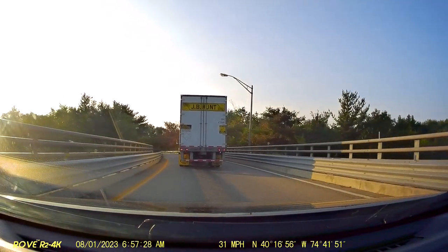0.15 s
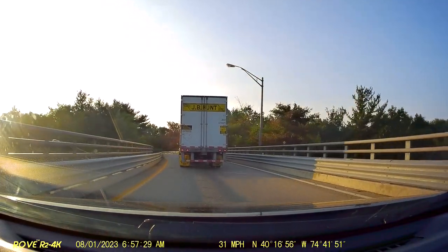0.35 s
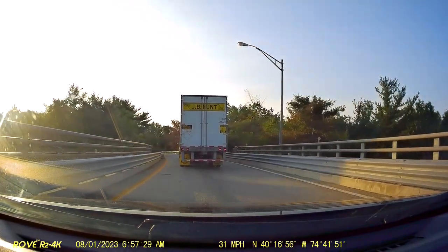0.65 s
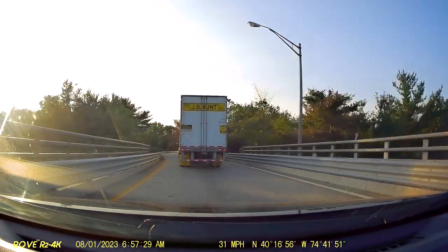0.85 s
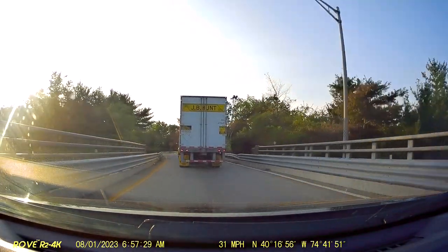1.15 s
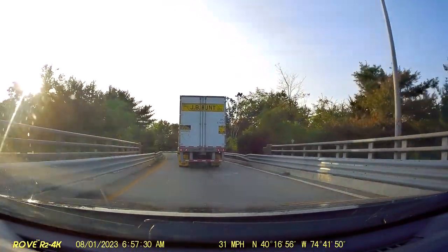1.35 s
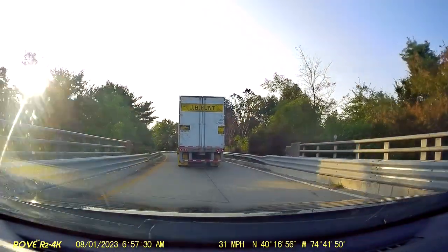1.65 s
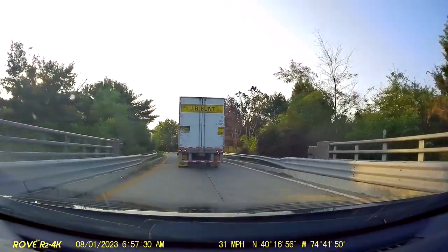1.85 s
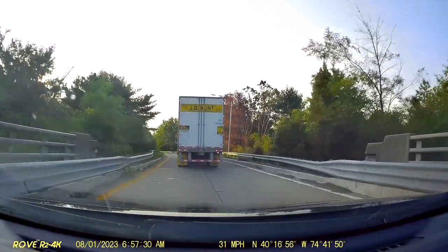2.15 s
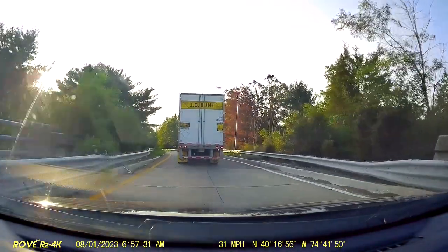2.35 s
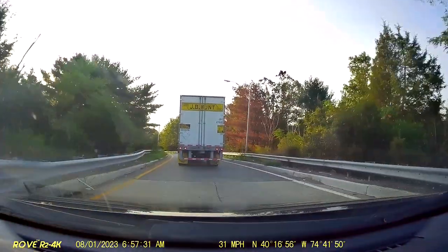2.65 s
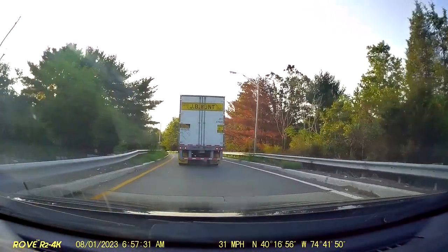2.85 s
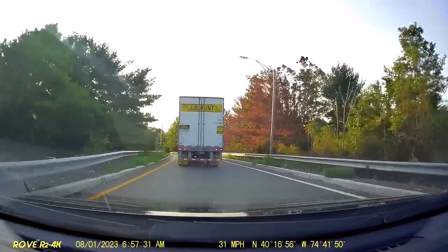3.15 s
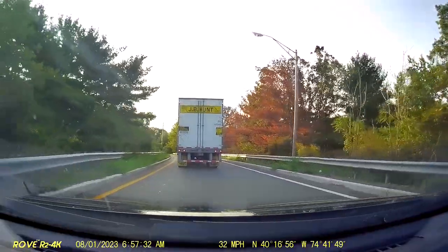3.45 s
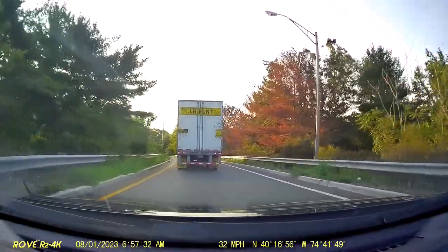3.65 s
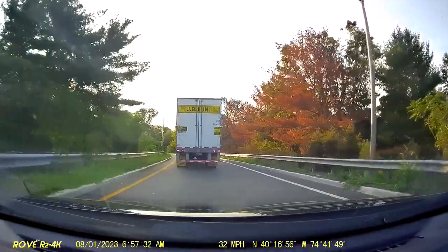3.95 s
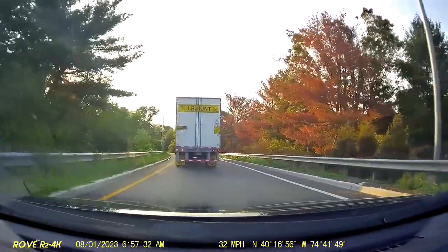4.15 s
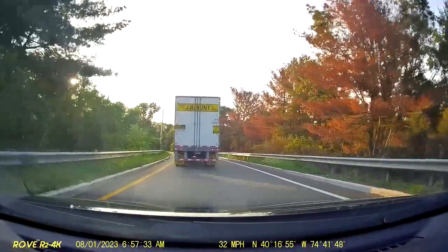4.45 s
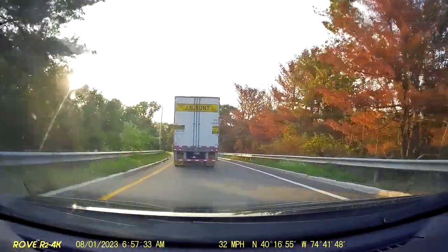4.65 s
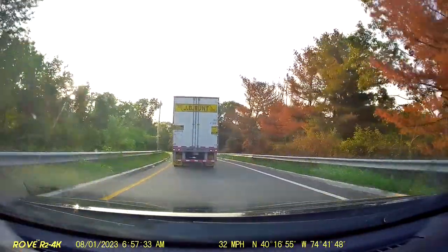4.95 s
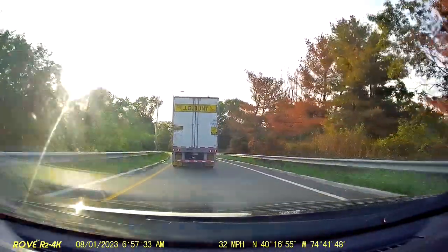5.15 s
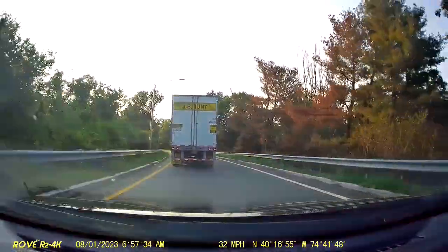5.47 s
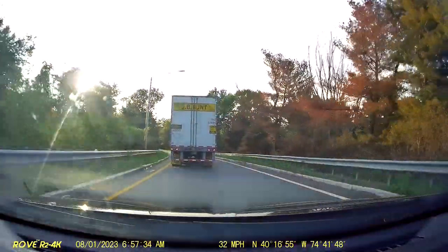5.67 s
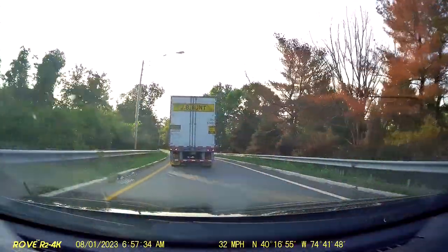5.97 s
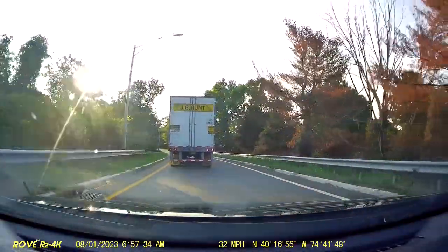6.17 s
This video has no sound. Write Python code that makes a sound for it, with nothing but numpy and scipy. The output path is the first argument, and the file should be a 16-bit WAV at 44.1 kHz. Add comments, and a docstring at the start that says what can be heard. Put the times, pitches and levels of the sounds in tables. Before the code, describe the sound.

A car's low rumble, engine drone and tyre noise heard from the cabin, with a run of dull thumps, then easing on smooth asphalt.

```python
"""A deep road rumble, a roar of tyres and a low engine drone, heard inside a car at the windscreen.
The car cruises at about 50 km/h over a concrete bridge, then on to smoother, quieter asphalt.
The rough road shakes the body and rings the air in the tyres; the tread roars through the glass
and rushing air hisses. Twice a low boom swells, as of tyres over road ripples. Road joints thump
the wheels and stir the plastic trim. Later, on the asphalt, two thin whines come and go."""
import sys
import numpy as np
from scipy import signal
from scipy.fft import rfft, irfft
from scipy.io import wavfile
from scipy.ndimage import uniform_filter1d

SR = 44100
rng = np.random.default_rng(int(sys.argv[2]) if len(sys.argv) > 2 else 0)


def to_wav(s):
    """Save 16-bit WAV."""
    ch = np.atleast_2d(s).T  # columns
    pcm = np.round(np.clip(ch, -1, 1) * 32767)  # PCM
    wavfile.write(sys.argv[1], SR, pcm.astype(np.int16))


N = 278271
TIME = np.arange(N) / SR
FREQS = np.maximum(np.arange(N // 2 + 1) * SR / N, 1)

# How strong each pitch is inside the car. Columns: pitch_hz, level_db
SHAKE_TONE = [(12, -25), (22, -19), (33, 0), (41, -4.5), (52, -7), (63, 5), (73, -10), (86, -2), (112, -6),
              (150, -15), (260, -77)]  # the shaking body
DRUM_TONE = [(70, -24), (130, -2), (152, 2), (178, 3.5), (245, -5), (310, 0), (348, 0.5), (390, -9.5),
             (480, -9.5), (800, -24.5)]  # coarse road drumming through the wheels
TREAD_TONE = [(250, -6.5), (450, 0), (620, 0), (740, -4.5), (900, -3.5), (1020, -4.5), (1160, -5.5),
              (1320, -7.5), (1640, -12), (1850, -20.5), (2800, -26), (3900, -33)]  # the roaring tread
WIND_TONE = [(800, -5), (1900, 6.5), (3000, 7.5), (3900, 0), (4700, 1), (5600, -2), (7000, -2.5),
             (10000, -5.5), (13000, -7), (15500, -11)]  # air rushing round the windscreen
# Worn stretches of road. Columns: middle_s, reach_s, extra_shake_db, extra_drum_db
WORN_PATCHES = [(.35, 0.23, -2.5, 2.5), (1.55, 0.44, 3.5, 3), (2.2, 0.11, 2, 1), (3.0, 0.15, 1, 3.5),
                (4.87, 0.097, 3.5, 3)]
# Pitches at which the panels and cabin ring. Columns: pitch_hz, width_hz, concrete_db, asphalt_db
PANEL_RINGS = [(670.7, 28, 7, 3.5), (838, 53, 7, 4.5), (928, 34, 7, 5), (1079.6, 59, 8.5, 8.5),
               (1115, 25, -4, -9), (1312, 78, 6, 5), (2696, 51, 7, 8)]
# Low, throbbing booms, as of tyres over road ripples. Columns: start_s, length_s, fade_s, level_db
LOW_BOOMS = [(0.032, 0.56, 0.27, -36), (4.916, 0.42, 0.09, -41.5)]
# Wheels hitting joints and patches, rear about 0.2 s after front. Columns: start_s, level_db, contact_s
WHEEL_HITS = [(1.282, -25.5, 0.0037), (1.307, -21, 0.016), (1.455, -20.5, 0.014), (1.525, -17, 0.0074),
              (2.076, -23, 0.005), (2.268, -21.5, 0.0054), (2.859, -16, 0.0056), (3.052, -19.5, 0.0034),
              (3.079, -16.7, 0.006), (3.266, -14, .0105), (3.477, -16, .015), (4.753, -33, .005),
              (4.944, -33, 0.011), (6.03, -35, 0.0048)]
# Low notes of the body and cabin after a hit. Columns: pitch_hz, rise_s, fade_60_db_s, level_db
BODY_NOTES = [(40.7, 0.04, 0.5, 2.5), (66.8, 0.0052, .24, 2.5), (83.8, 0.026, 0.15, 6),
              (98.5, 0.0065, 0.091, 9.5), (136, 0.0046, 0.092, 9), (222.2, 0.011, 0.66, 2)]
# Loose trim knocking, rubbing and ticking. Columns: start_s, level_db, length_s, pitch_hz, width_hz
TRIM_RATTLES = [(2.014, -37, 0.048, 510, 220), (2.16, -61, 0.23, 3200, 2300),
                (2.855, -38.5, 0.02, 950, 1200), (2.857, -54, 0.028, 2450, 2300),
                (3.326, -58, .026, 2800, 3400), (3.486, -58, 0.077, 3030, 2830),
                (3.494, -54, 0.011, 4900, 2500), (3.503, -57.5, 0.016, 5270, 3300),
                (3.515, -57.5, 0.0031, 8000, 5500), (4.768, -60, 0.005, 7000, 8000)]
# Brief thin tones. Columns: start_s, end_s, start_hz, end_hz, level_db
THIN_WHINES = [(3.606, 4.13, 1249, 1236, -56), (4.85, 5.64, 1724, 1733, -63)]

ASPHALT_S, CHANGE_S = 3.56, 0.23  # when the concrete ends, and how long the change takes
FIRING_HZ, SAG_HZ_PER_S = 43.04, 0.42  # the engine's firing rate starts here and sinks
ENGINE_DB, EASE_DB_PER_S = -39.5, 1.26  # so does its level
BOOM_RISE_S, CREST_S, CREST_DB = 0.031, 0.0013, 9  # a crest is the sharp peak in each cycle of a boom
THUMP_DB, JUDDER_DB, SLAP_DB = -6.5, -16, -30  # added to each wheel hit's level


def gain(db):
    """Turn decibels into a number to multiply by."""
    return 10 ** (np.asarray(db) / 20)


def unit(x):
    """Scale a signal to an average strength (rms) of 1."""
    return x / np.sqrt(np.mean(x ** 2))


def tone_curve(points):
    """Join (pitch_hz, level_db) points into gains, falling 24 dB an octave past the last."""
    hz, db = np.transpose(points)
    return gain(np.interp(np.log(FREQS), np.log(hz), db)) * np.minimum(hz[-1] / FREQS, 1) ** 4


def peak(hz, width_hz):
    """Gains of something that rings at one pitch; raising them to a power narrows the peak."""
    return 1 / np.sqrt(1 + ((FREQS ** 2 - hz ** 2) / (FREQS * width_hz)) ** 2)


def noise(gains):
    """Noise of strength 1, shaped by a gain for each pitch."""
    return unit(irfft(rfft(rng.standard_normal(N)) * gains, N))


def wander(rate_hz):
    """A smooth random wobble of strength 1."""
    return noise(np.exp(-(FREQS / rate_hz) ** 2))


def steady(x, span_s):
    """Even out a noise's slow swells and keep its quick flutter."""
    return x / np.sqrt(uniform_filter1d(x ** 2, int(span_s * SR)) + 1e-9)


def burst(start_s, length_s):
    """A level that jumps up to 1 and dies away."""
    age = np.clip((TIME - start_s) / length_s * 4, 0, 40)
    return age * np.exp(1 - age)


def on_asphalt(lead_s):
    """Goes from 0 on concrete to 1 on asphalt; lead_s makes the change come early."""
    return np.clip((TIME + lead_s - ASPHALT_S) / CHANGE_S + 0.5, 0, 1)


def road_db(concrete_db, step_db, db_per_s, lead_s=0):
    """A level that holds on concrete, steps down on asphalt and sinks as the road gets smoother."""
    return concrete_db + step_db * on_asphalt(lead_s) + db_per_s * np.maximum(TIME - ASPHALT_S, 0)


def road_wear():
    """Extra decibels of shake and of drumming, coming and going over each worn patch."""
    return sum(np.outer((shake_db, drum_db), np.exp(-((TIME - middle_s) / reach_s) ** 2))
               for middle_s, reach_s, shake_db, drum_db in WORN_PATCHES)


def body_shake(wear_db):
    """The uneven road shakes the car's body into a deep rumble."""
    level_db = road_db(concrete_db=-34.5, step_db=-5, db_per_s=-1.3) + wear_db
    return steady(noise(tone_curve(SHAKE_TONE)), span_s=0.15) * gain(level_db)


def road_drumming(wear_db):
    """The coarse surface drums up through the wheels."""
    level_db = road_db(concrete_db=-37.5, step_db=-6, db_per_s=-0.84, lead_s=0.12) + wear_db
    return steady(noise(tone_curve(DRUM_TONE)), span_s=0.12) * gain(level_db)


def tyre_ring(wear_db):
    """The air inside the tyres rings at one pitch, mostly on rough concrete."""
    level_db = road_db(concrete_db=-43.5, step_db=-8, db_per_s=-1.5) + 1.6 * wear_db
    return steady(noise(peak(hz=219.6, width_hz=10.1) ** 2), span_s=0.13) * gain(level_db)


def tread_roar():
    """Tread blocks patter on the road; glass and panels shape the roar, which flutters with the road."""
    lead_s = 0.2  # softens first, as soon as the front tyres reach asphalt
    roar = noise(tone_curve(TREAD_TONE))
    lift_db = sum(np.outer((concrete_db, asphalt_db), peak(hz, width_hz) ** 2)
                  for hz, width_hz, concrete_db, asphalt_db in PANEL_RINGS)
    concrete, asphalt = (unit(x) for x in irfft(rfft(roar) * gain(lift_db), N))
    share = on_asphalt(lead_s)
    level_db = road_db(concrete_db=-41, step_db=-2.5, db_per_s=-0.43, lead_s=lead_s)
    flutter_db = 0.57 * wander(rate_hz=21) + 0.15 * wander(rate_hz=6.3)
    return (concrete * (1 - share) + asphalt * share) * gain(level_db + flutter_db)


def wind_hiss():
    """Air rushing round the windscreen makes a smooth, steady hiss."""
    return gain(-62) * noise(tone_curve(WIND_TONE))


def drone_and_booms():
    """A low engine drone eases off, and twice a rippled road booms at the same pitch."""
    boom = 0
    for start_s, length_s, fade_s, db in LOW_BOOMS:
        rise = (TIME - start_s) / BOOM_RISE_S
        fall = (start_s + length_s - TIME) / fade_s
        boom += gain(db) * np.clip(np.minimum(rise, fall), 0, 1)
    hz = FIRING_HZ - SAG_HZ_PER_S * TIME
    phase = 2 * np.pi * np.cumsum(hz * (1 + 0.00986 * wander(rate_hz=3.9))) / SR
    hum = unit(np.sin(phase) + gain(-9.5) * np.sin(2 * phase) + gain(-7.5) * np.sin(3 * phase))
    hum *= gain(ENGINE_DB - EASE_DB_PER_S * TIME) + boom
    crests = np.exp((np.sin(phase) - 1) / (2 * np.pi * hz * CREST_S) ** 2)
    throb = gain(CREST_DB) * boom * (crests - crests.mean())
    return (hum + throb) * gain(0.54 * wander(rate_hz=6.4))


def body_ring():
    """The car's answer to one hit: the cabin knocks at once and the heavy body swings up later."""
    age = TIME[:SR // 2]
    ring = 0
    for hz, rise_s, fade_s, db in BODY_NOTES:
        swell = np.sin(np.pi / 2 * np.minimum(age / rise_s, 1)) ** 2
        fade = gain(db - 60 * np.maximum(age - rise_s, 0) / fade_s)
        ring += swell * fade * np.sin(2 * np.pi * hz * age)
    return ring


def joint_thumps():
    """A joint pushes a wheel: the body thumps, the broken edge judders and the tread slaps."""
    push, judder, slap = np.zeros((3, N))
    for start_s, db, contact_s in WHEEL_HITS:
        pulse = np.sin(np.pi * np.clip((TIME - start_s) / contact_s, 0, 1))
        push += gain(db) * pulse / pulse.sum()
        judder += gain(db + JUDDER_DB) * burst(start_s, length_s=0.08)
        slap += gain(db + SLAP_DB) * burst(start_s, length_s=0.025)
    thumps = gain(THUMP_DB) * signal.fftconvolve(push, body_ring())[:N]
    judder *= steady(noise(peak(hz=159, width_hz=148) ** 2), span_s=0.11)
    slap *= noise(peak(hz=540, width_hz=560) ** 2)
    return thumps + judder + slap


def trim_rattle():
    """Plastic trim knocks and rubs in short, grainy bursts as the body twists."""
    grain = gain(2 * wander(rate_hz=1100))
    return grain * sum(gain(db) * burst(start_s, length_s) * noise(peak(hz, width_hz) ** 4)
                       for start_s, db, length_s, hz, width_hz in TRIM_RATTLES)


def whines():
    """Thin tones fade in, slide a little in pitch and fade out."""
    out = np.zeros(N)
    for start_s, end_s, start_hz, end_hz, db in THIN_WHINES:
        progress = np.clip((TIME - start_s) / (end_s - start_s), 0, 1)
        hz = start_hz + (end_hz - start_hz) * progress + 1.54 * wander(rate_hz=12)
        fade = np.sqrt(np.abs(np.sin(np.pi * progress)))
        out += gain(db) * fade * unit(np.sin(2 * np.pi * np.cumsum(hz) / SR))
    return out


def scene():
    """Everything that reaches the windscreen, in one channel."""
    shake_db, drum_db = road_wear()
    road = body_shake(shake_db) + road_drumming(drum_db) + tyre_ring(drum_db) + tread_roar()
    return (road + wind_hiss() + drone_and_booms() + joint_thumps() + trim_rattle() + whines())[None]


def record(dry):
    """The small microphone loses the deepest bass, and the recorder cuts the highest treble."""
    bass_cut = signal.butter(2, 16, "high", fs=SR, output="sos")
    treble_cut = signal.ellip(10, 0.2, 80, 15400, fs=SR, output="sos")
    return signal.sosfilt(treble_cut, signal.sosfilt(bass_cut, dry))


dry = scene()
out = record(dry)
to_wav(out)
```